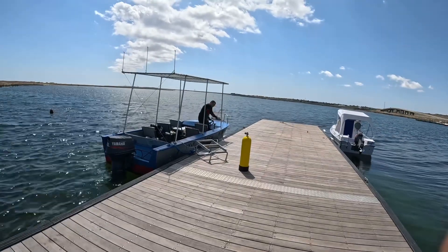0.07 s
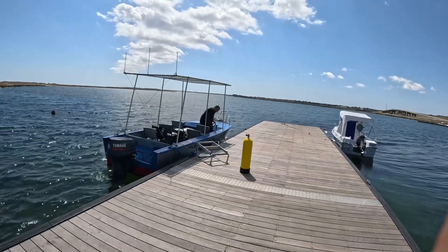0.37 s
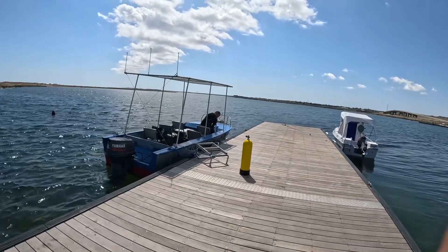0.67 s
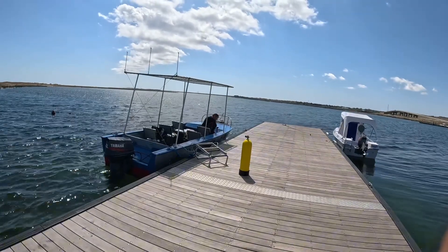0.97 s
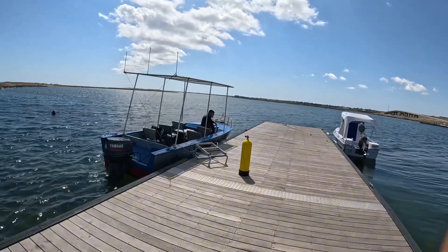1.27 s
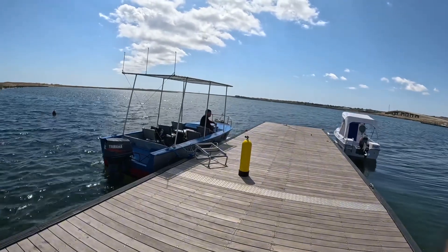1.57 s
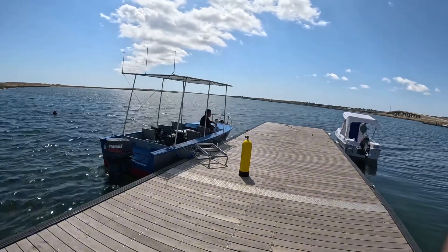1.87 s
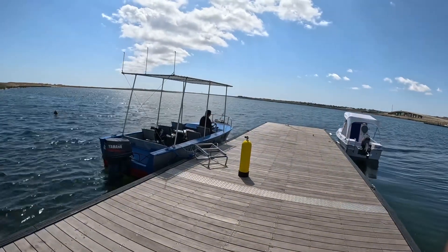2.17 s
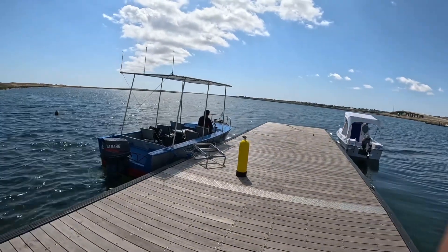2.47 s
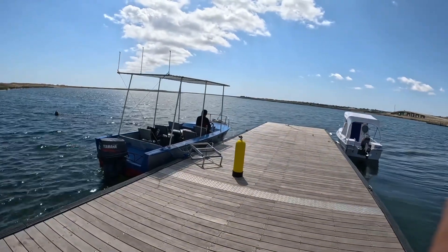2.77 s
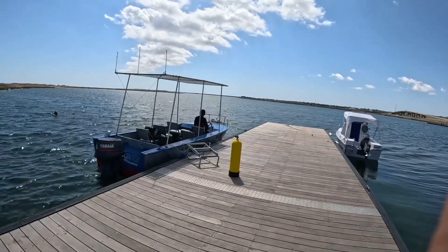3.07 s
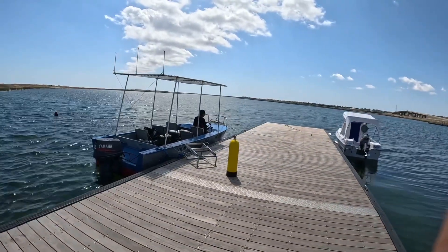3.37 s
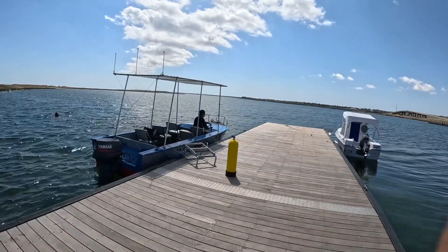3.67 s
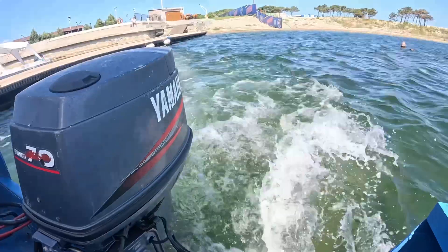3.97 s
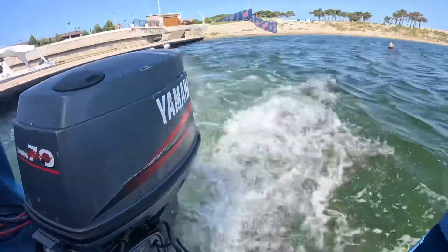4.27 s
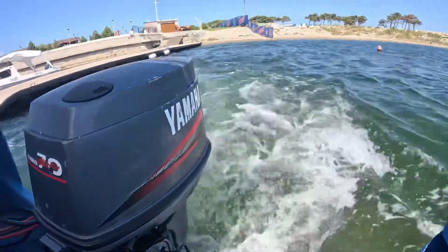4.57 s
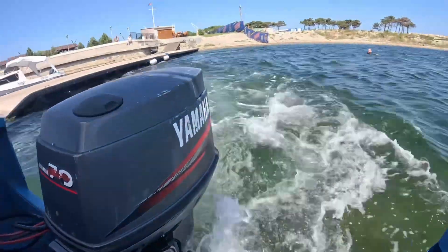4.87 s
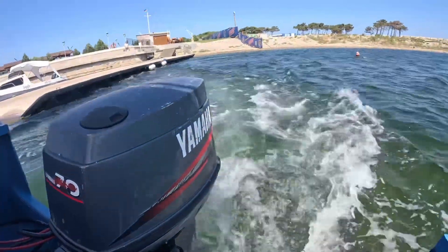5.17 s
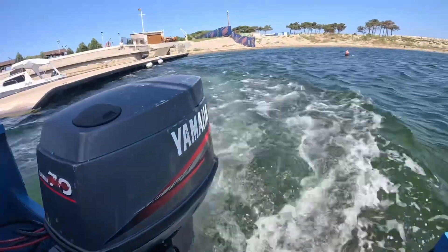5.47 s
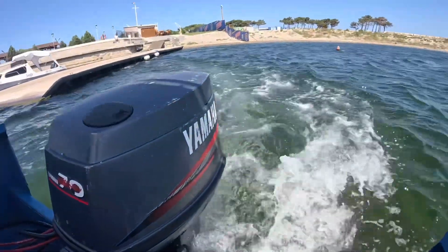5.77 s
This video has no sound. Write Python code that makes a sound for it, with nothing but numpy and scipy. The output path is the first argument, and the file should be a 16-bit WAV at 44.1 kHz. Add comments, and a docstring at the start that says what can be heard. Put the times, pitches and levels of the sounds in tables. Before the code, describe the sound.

Gusty wind rumbles and whistles on a jetty before a cut to a running outboard motor and rushing water.

```python
"""Gusts of wind buffet a microphone on a wooden jetty, hissing and whistling across its openings,
while small waves lap. After a short silence the scene changes to a moving boat with a three-cylinder
two-stroke outboard motor. Its exhaust throbs as gas gulps out under water, its pistons clatter under
the cover, the wake churns and the wind rumbles."""
import sys
import numpy as np
from scipy import signal
from scipy.fft import rfft, irfft
from scipy.io import wavfile

SR = 44100
rng = np.random.default_rng(int(sys.argv[2]) if len(sys.argv) > 2 else 0)


def wav_out(sig):
    """Save sig, one row per channel (or a flat mono array), as 16-bit PCM at SR to the path in sys.argv[1]."""
    wavfile.write(sys.argv[1], SR, np.round(np.clip(np.atleast_2d(sig).T, -1, 1) * 32767).astype(np.int16))


N = 261513
TIME = np.arange(N) / SR
FREQS = np.fft.rfftfreq(N, 1 / SR)
JETTY_END_S, BOAT_START_S, BOAT_FULL_S = 3.783, 3.9, 3.99

# how loud the wind rumbles on the jetty: t/s, level/dB
RUMBLE_LEVEL = [(0, -33.5), (0.45, -28), (0.6, -31.5), (0.78, -27.5), (1.05, -31), (1.35, -26),
                (1.75, -27.5), (2.0, -31), (2.4, -32.5), (3.07, -31), (3.2, -29), (3.48, -31), (3.75, -29)]
# tone colour of that rumble: f/Hz, relative level/dB
RUMBLE_COLOUR = [(7.1, -25), (12, 4.5), (23, 5), (31, -9.5), (43, -3), (71, -6.5), (145, -15.5),
                 (264, -21.5), (489, -31), (637, -45), (800, -48), (1040, -57.5), (1760, -120)]
# big eddies (swirls of air) that thump the microphone: t/s, peak level/dB
THUMPS = [(0.196, -25), (0.473, -29.5), (0.747, -28), (1.387, -24), (1.506, -21), (1.715, -28.5),
          (1.837, -35.5), (3.158, -30.5), (3.225, -28), (3.321, -30.5)]
# strength of the gusts: t/s, relative level/dB
GUSTS = [(0, -7.5), (0.2, -1), (0.43, 5), (0.6, -2), (0.74, 4), (0.95, -2.5), (1.12, 2.5), (1.35, 6.5),
         (1.75, 4), (2.05, -0.2), (2.4, -0.5), (2.6, -3.5), (3.07, -1), (3.3, 4), (3.5, -3.5), (3.78, -3)]
# tone colour of the rushing air: f/Hz, relative level/dB
RUSH_COLOUR = [(300, -12), (480, 1), (700, -18.5), (1000, -5.5), (1300, -13), (1680, -9.5), (1860, -23),
               (2250, -13.5), (2500, -28.5), (3050, -13.5), (3400, -24.5), (4000, -41), (4800, -36),
               (7500, -41), (9000, -70)]
# high-pitched hollows in the microphone's openings: f/Hz, width/Hz, relative level/dB
HOLLOWS = [(1620, 150, -14), (2250, 180, -7), (2897, 110, -5), (3020, 158, 0), (3285, 39, -11),
           (3390, 64, -17.5), (4420, 110, -24)]
# sharp eddies that flick those hollows: t/s, relative level/dB
FLICKS = [(1.287, -50), (1.41, -43), (1.609, -46.5), (2.757, -53.5), (3.297, -48), (3.676, -55.5)]
# puffs that make the lowest hollow hoot: t/s, level/dB
HOOTS = [(1.191, -46), (1.297, -39), (1.545, -44), (1.638, -44), (1.939, -42.5), (3.342, -41), (3.676, -45)]
# tone colour of the ripples: f/Hz, relative level/dB
RIPPLE_COLOUR = [(500, 5), (2500, 4), (4000, -7.5), (5100, -2.5), (5500, -0.5), (6000, -5), (7800, -6),
                 (8300, -14.5), (9000, -20), (10000, -46)]
# small waves slapping the jetty: t/s, half-width/s, level/dB
LAPS = [(1.1, 0.0031, -63.5), (1.4, 0.14, -68.5), (1.6, 0.0075, -69), (2.41, 0.013, -59), (2.47, 0.11, -70),
        (3.215, 0.049, -67.5), (3.224, 0.0027, -64)]
# tone colour of their splash: f/Hz, relative level/dB
SPLASH_COLOUR = [(1500, -8), (3600, 2.5), (5000, 2), (6500, -10), (8000, -2.5), (9000, -39.5)]
# the microphone's two openings: f/Hz, left minus right/dB, likeness/0-1, phase lead of the left/rad
OPENINGS = [(30, -1, 1, 0), (300, 2, 0.99, 0.087), (520, -2, 0.86, 0.78), (780, -4.5, 0.7, -1.1),
            (1110, 7, 0.99, -0.41), (1500, 2.5, 0.5, -0.058), (1920, 2.5, 0.1, -0.41),
            (2240, -2.5, 1, -1.3), (2430, 2, 0.1, -1.3), (2800, 2.5, 1, -0.4), (3250, 3, 0.9, -1.2),
            (4000, -1, 0.6, -0.76), (5200, 0, 0.98, 0)]

# how fast the motor fires: t/s, rate/Hz
FIRING_RATE = [(3.9, 84.6), (4.25, 85.2), (4.7, 84.1), (5.93, 83.8)]
# tones of the exhaust note:
# multiple of the firing rate, added multiple of the gulp rate, relative level/dB, throb depth, drift/rad
EXHAUST_TONES = [(1, 0, -2.8, 1.1, .3), (2, 0, -12, .15, .7), (2, 1, -17, 0, .8), (3, 1, -17.5, 0, .6),
                 (4, 0, -19.5, 0, 1.3), (4, 1, -14.6, 0, .95)]
# how freely the exhaust breaks out of the water: t/s, relative level/dB
EXHAUST_FREEDOM = [(3.99, 1), (4.3, 0), (4.62, 3.5), (4.82, -3.5), (5.0, 0.5), (5.27, 4), (5.52, -1),
                   (5.66, -8), (5.8, -1.5), (5.92, -8)]
# ringing of the exhaust housing and hull: f/Hz, width/Hz, level/dB
HOUSING_RINGS = [(166, 36, -40.5), (236.5, 6.9, -45), (273.8, 16, -41), (350.7, 27.7, -38),
                 (428, 16, -50.5), (593.2, 12.7, -49)]
# tone colour of the motor's clatter: f/Hz, relative level/dB
CLATTER_COLOUR = [(420, -37), (560, -19), (760, -3), (900, 5), (1060, 3.5), (1200, -2.5), (1350, -27),
                  (1500, -5.5), (1620, -29.5), (2500, -34)]
# ringing of the motor's cover: f/Hz, width/Hz, relative level/dB
COVER_RINGS = [(860, 198, -2), (1049.4, 30, -3.5), (1093, 56, -13.5), (1189, 29, -19.5)]
# ringing of the metal engine block: f/Hz, width/Hz, relative level/dB
BLOCK_RINGS = [(1857, 38, -14.5), (2155, 64, -11.5), (2251, 104, -3.5), (2383, 112, -6.5),
               (2974, 92, -12.5), (3270, 81, -10), (4270, 240, -16.5), (5410, 380, -22.5),
               (6300, 270, -29.5)]
# brief buzzes of the cover and block: t/s, half-width/s, f/Hz, level/dB
BUZZES = [(4.032, 0.0066, 1040, -28.5), (4.041, 0.005, 2230, -36.5), (4.11, 0.0043, 2280, -39),
          (4.19, 0.0094, 1091, -25), (4.25, 0.019, 1077, -31.5), (4.633, 0.0032, 2250, -35.5),
          (5.408, 0.0069, 2260, -35.5), (5.476, .006, 2300, -38), (5.538, 0.017, 2300, -39.5)]
# how loud the wake churns: t/s, level/dB
WAKE_LEVEL = [(4.0, -41.5), (4.38, -40.5), (4.9, -42), (5.06, -45), (5.55, -41)]
# tone colour of the wake: f/Hz, relative level/dB
WAKE_COLOUR = [(300, 0), (1400, 0.5), (1620, -7), (1780, 1.5), (2150, 1), (2700, -2), (3400, -5),
               (3800, -8.5), (4800, -18), (6500, -23), (7100, -29), (8200, -26), (10500, -39), (14000, -46)]
# spray thrown up from the wake: t/s, half-width/s, level/dB
SPRAYS = [(4.37, .04, -65), (5.14, .015, -62), (5.8, .015, -60)]
# tone colour of the spray: f/Hz, relative level/dB
SPRAY_COLOUR = [(2500, -8.5), (5000, 5), (8000, 1), (11000, -23), (14000, -18)]
# tone colour of the wind on the boat: f/Hz, relative level/dB
HEADWIND_COLOUR = [(6, -19.5), (20, 3.5), (34, -13), (55, -8), (90, -16), (140, -17), (200, -21),
                   (300, -31.5), (500, -43.5)]


def gain_of(db):
    """Turns decibels into a number to multiply a sound by."""
    return 10 ** (np.asarray(db) / 20)


def evened(x):
    """Scales x to an average (rms) size of 1."""
    return x / np.sqrt(np.mean(x ** 2) + 1e-20)


def curve(rows):
    """Joins (time, value) points with straight lines."""
    return np.interp(TIME, *np.transpose(rows))


def noise():
    """White noise: a plain hiss."""
    return rng.standard_normal(N)


def wander(hz):
    """A smooth random wobble of size 1, up to about hz times a second."""
    return evened(irfft(rfft(noise()) / (1 + (FREQS / hz) ** 4), N))


def coloured(x, colour):
    """Gives x a tone colour and size 1; above the last row it falls 24 dB more each octave."""
    hz, db = np.transpose(colour)
    shape_db = np.interp(np.log(FREQS + 1), np.log(hz + 1), db)
    octaves_above = np.log2(np.maximum(FREQS / hz[-1], 1))
    return evened(irfft(rfft(x) * gain_of(shape_db - 24 * octaves_above), N))


def ringing(x, rings):
    """Lets x ring in narrow bands of pitch, each at its own level."""
    spectrum = rfft(x)
    return sum(gain_of(db) * evened(irfft(spectrum / (1 + 1.3j * (FREQS - hz) / width) ** 2, N))
               for hz, width, db in rings)


def swells(rows):
    """A bell-shaped rise and fall in loudness for each row."""
    return sum(gain_of(db) * np.exp(-.5 * ((TIME - t) / half_width) ** 2) for t, half_width, db in rows)


def tone(hz):
    """A slightly unsteady tone of size 1."""
    return evened(np.sin(2 * np.pi * hz * TIME + 0.61 * wander(hz=50)))


def drops(per_s, spread_db):
    """Scattered clicks of uneven strength."""
    clicks = noise() * (rng.random(N) < per_s / SR)
    return evened(clicks * gain_of(spread_db * np.minimum(rng.exponential(1, N), 4)))


def buffeting(eddies, thump_width_s=0.0024):
    """Eddies rumble on the microphone; the core of a big one sucks at it with a thump."""
    sound = gain_of(curve(RUMBLE_LEVEL)) * coloured(noise() * gain_of(eddies), RUMBLE_COLOUR)
    for t, db in THUMPS:
        offset = (TIME - t) / thump_width_s
        sound += gain_of(db) * (offset ** 2 - 1) * np.exp(-.5 * offset ** 2)
    return sound


def rushing_air(eddies):
    """Air hisses across the microphone's openings, louder in each gust."""
    air = noise() * gain_of(1.2 * eddies + 0.73 * wander(hz=250))
    return gain_of(-51 + 0.81 * curve(GUSTS)) * coloured(air, RUSH_COLOUR)


def whistling_hollows(eddies, whistle_hz=1087.4):
    """Wind sounds the hollows: the high ones rasp in strong gusts, the lowest whistles in light air too."""
    gust_db = curve(GUSTS)
    rough_air = noise() * gain_of(1.2 * eddies + 2.1 * wander(hz=160))
    flicks = swells((t, .0032, db) for t, db in FLICKS)
    rasp = np.hypot(gain_of(-61.5 + 1.58 * gust_db), flicks) * ringing(rough_air, HOLLOWS)
    whistle = gain_of(-52 + 0.79 * gust_db + 0.5 * eddies) * ringing(noise(), [(whistle_hz, 48, 0)])
    hoots = swells((t, .0062, db) for t, db in HOOTS) * tone(whistle_hz)
    return rasp + whistle + hoots


def lapping():
    """Ripples fizz all round; now and then a wave slaps the jetty's posts with a soft splash."""
    ripples = gain_of(-66.5) * coloured(noise() + .3 * drops(per_s=410, spread_db=1.5), RIPPLE_COLOUR)
    splash = noise() * gain_of(1.4 * wander(hz=160))
    return ripples + swells(LAPS) * coloured(splash, SPLASH_COLOUR)


def two_openings(x):
    """The left and right openings hear x with their own level and delay, and partly their own swirls."""
    hz, *columns = np.transpose(OPENINGS)
    balance_db, likeness, lead = (np.interp(FREQS, hz, column) for column in columns)
    # the unshared part swells and fades like x, but its phases are scrambled
    frames = signal.stft(x, nperseg=512)[2]
    scrambled = frames * np.exp(2j * np.pi * rng.random(frames.shape))
    unshared = np.sqrt(2) * signal.istft(scrambled, nperseg=512)[1][:N]
    shared_gain, own_gain = np.sqrt((1 + likeness) / 2), np.sqrt((1 - likeness) / 2)
    shared, own = shared_gain * rfft(x), own_gain * rfft(unshared)
    tilt = gain_of(balance_db / 2) * np.exp(.5j * lead)
    left, right = (shared + own) * tilt, (shared - own) / tilt
    # keep the average of the two sides as loud as x
    centre = np.hypot(shared_gain * abs(tilt + 1 / tilt), own_gain * abs(tilt - 1 / tilt)) / 2
    return irfft(np.array([left, right]) / centre, N)


def exhaust(firings, gulps):
    """Each firing puffs into the housing; gas gulping out under water makes the lowest tones throb."""
    throb = np.cos(2 * np.pi * gulps)
    pitch_bend = -.45 * np.sin(2 * np.pi * gulps)
    note = np.zeros(N)
    for per_firing, per_gulp, db, depth, drift in EXHAUST_TONES:
        level = gain_of(db + wander(hz=4.4))
        cycles = per_firing * firings + per_gulp * gulps
        phase = 2 * np.pi * cycles + depth * pitch_bend + drift * wander(hz=6.5)
        note += level * evened(np.cos(phase) * (1 + depth * throb))
    puffs = noise() * (.5 + np.exp(-(firings % 1) / 0.17))
    return gain_of(-26.5 + 0.74 * curve(EXHAUST_FREEDOM)) * note + ringing(puffs, HOUSING_RINGS)


def piston_clatter(firings, gulps, spread_db=3.2, decay_firings=.3):
    """Pistons knock at each firing, never twice alike, and ring the cover and the engine block."""
    once_a_turn = 1 + 0.14 * np.cos(2 * np.pi * firings / 3)
    strength = gain_of(spread_db * noise()[firings.astype(int)])
    knocks = evened((1 + strength * np.exp(-(firings % 1) / decay_firings)) * once_a_turn)
    cover = gain_of(-4) * coloured(noise() * knocks, CLATTER_COLOUR)
    cover += ringing(noise() * knocks, COVER_RINGS)
    rattle = 1 + .19 * np.cos(2 * np.pi * (gulps + .17))  # hardest just before each gulp
    block = ringing(noise() * (.5 + knocks) * rattle, BLOCK_RINGS)
    buzzes = sum(swells([(t, half_width, db)]) * tone(hz) for t, half_width, hz, db in BUZZES)
    # cover and block both grow slowly quieter
    elapsed_s = TIME - BOAT_FULL_S
    cover_gain = gain_of(-32.5 - 0.7 * elapsed_s + 0.43 * wander(hz=22))
    block_gain = gain_of(-39.5 - 2 * elapsed_s)
    return cover_gain * cover + block_gain * block + buzzes


def wake(churn_db=1.3):
    """Foam churns behind the boat and spray falls into it."""
    foam = (noise() + 0.5 * drops(per_s=1800, spread_db=1.5)) * gain_of(churn_db * wander(hz=30))
    spray = swells(SPRAYS) * coloured(drops(per_s=900, spread_db=-2), SPRAY_COLOUR)
    return gain_of(curve(WAKE_LEVEL)) * coloured(foam, WAKE_COLOUR) + spray


def headwind():
    """The boat's own motion pushes air over the microphone, which rumbles."""
    return gain_of(-26) * coloured(noise() * gain_of(0.5 * wander(hz=23)), HEADWIND_COLOUR)


def scene():
    """The jetty in stereo, a short silence, then the boat fades in, in the centre."""
    # running counts of the motor's firings and of the gulps of gas (17.65 a second)
    firings = np.cumsum(curve(FIRING_RATE) * (1 + .004 * wander(hz=8))) / SR
    gulps = 17.65 * (TIME - 4.297) + .04 * wander(hz=3)
    boat = exhaust(firings, gulps) + piston_clatter(firings, gulps) + wake() + headwind()
    eddies = wander(hz=45)  # the same swirls shake all the wind sounds on the jetty
    wind = buffeting(eddies) + rushing_air(eddies) + whistling_hollows(eddies)
    jetty = two_openings(wind + lapping())
    fade_out = np.clip((JETTY_END_S - TIME) / 0.0032, 0, 1)
    fade_in = np.clip((TIME - BOAT_START_S) / (BOAT_FULL_S - BOAT_START_S), 0, 1) ** 1.01
    return jetty * fade_out + boat * fade_in


def record(dry):
    """Cuts away the highest treble, above 14400 Hz."""
    low_pass = signal.firwin(511, 14400, window=("kaiser", 9), fs=SR)
    return signal.oaconvolve(dry, low_pass[None], "same")


dry = scene()
out = record(dry)
wav_out(out)
```